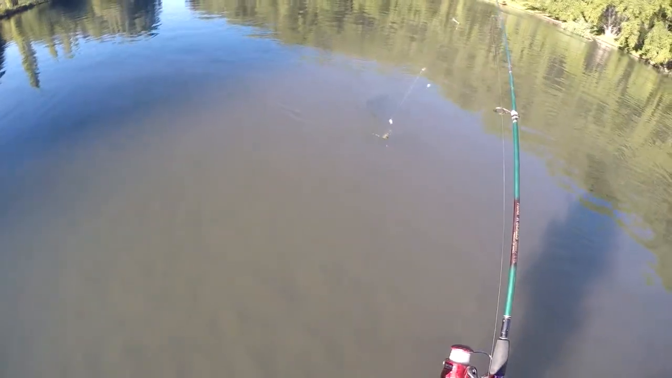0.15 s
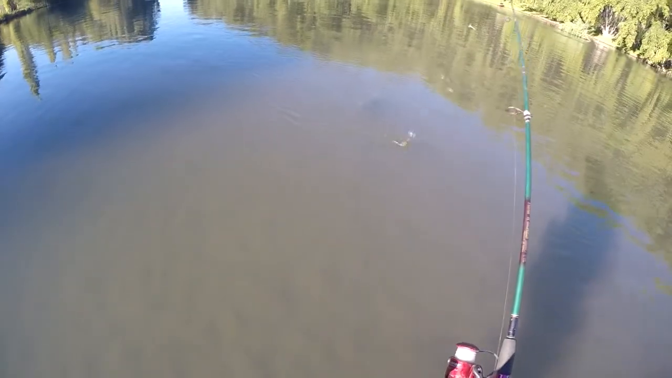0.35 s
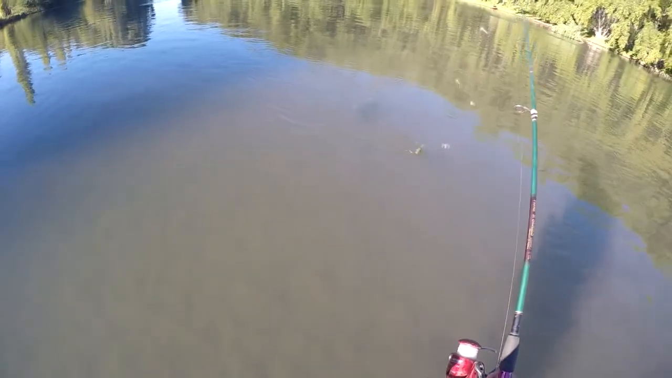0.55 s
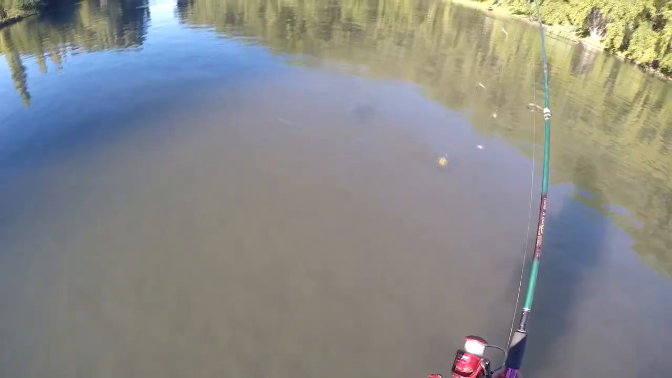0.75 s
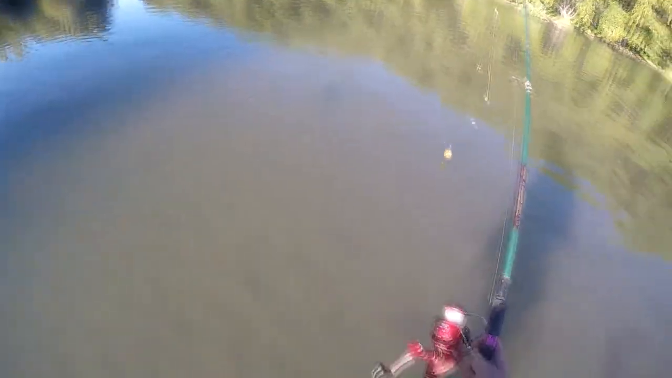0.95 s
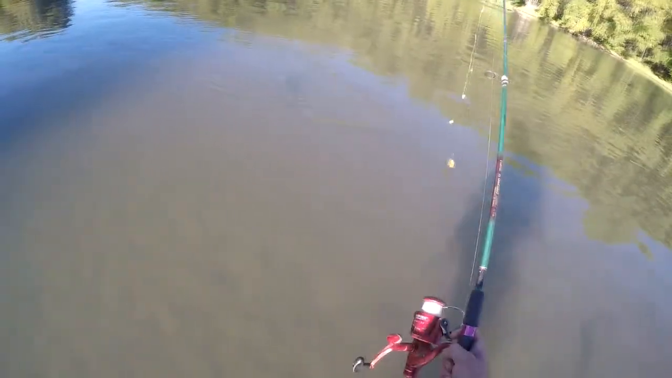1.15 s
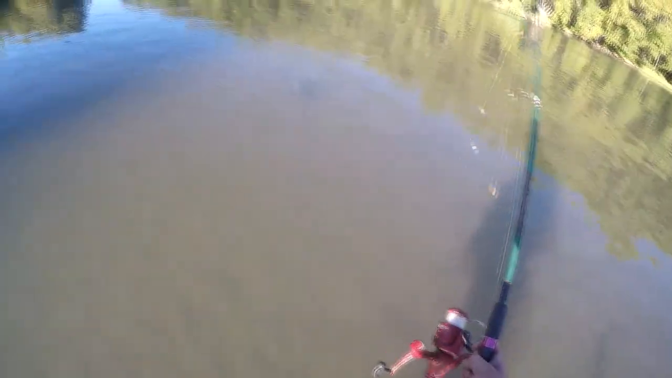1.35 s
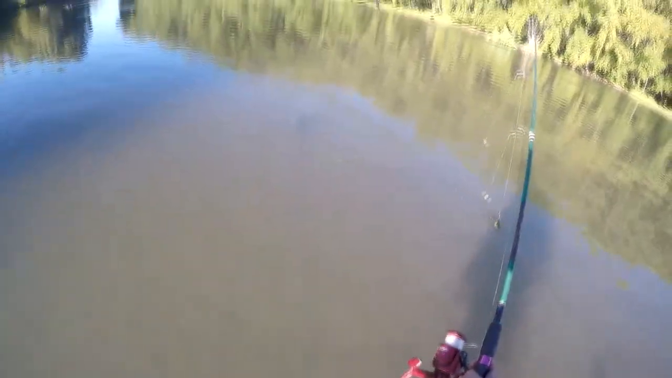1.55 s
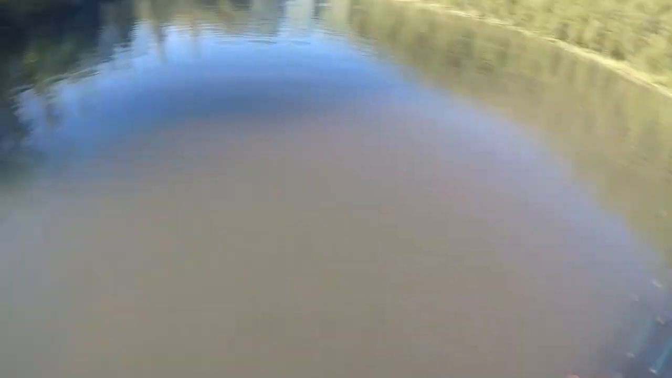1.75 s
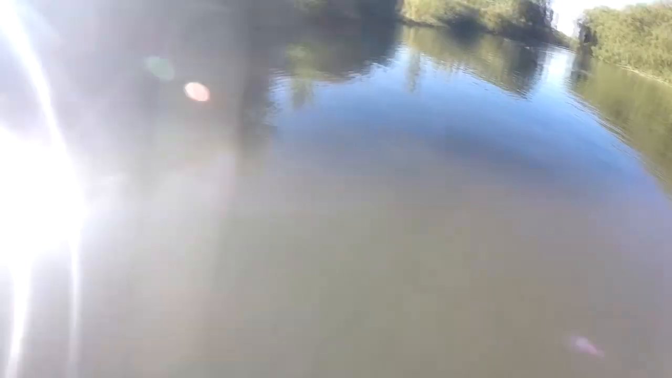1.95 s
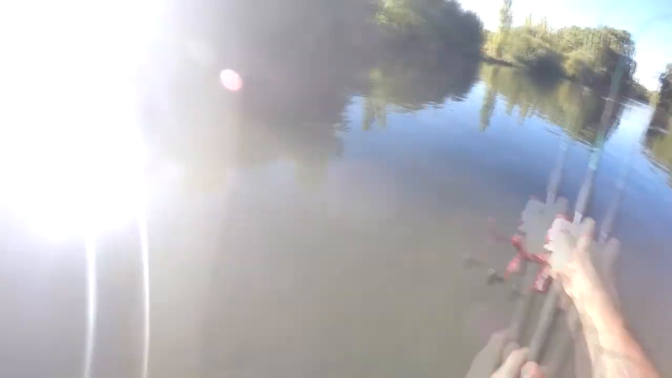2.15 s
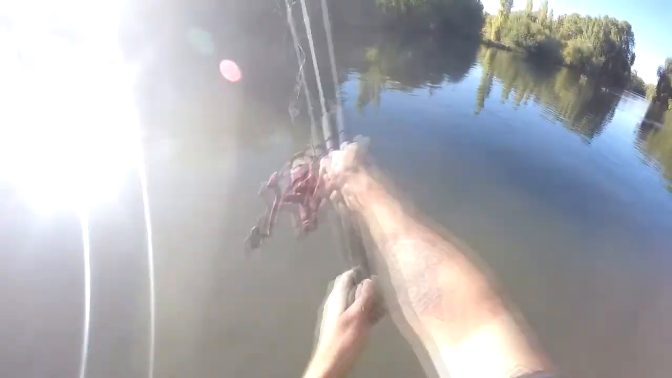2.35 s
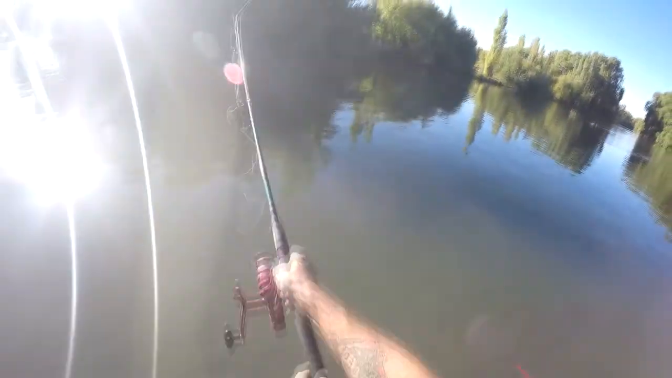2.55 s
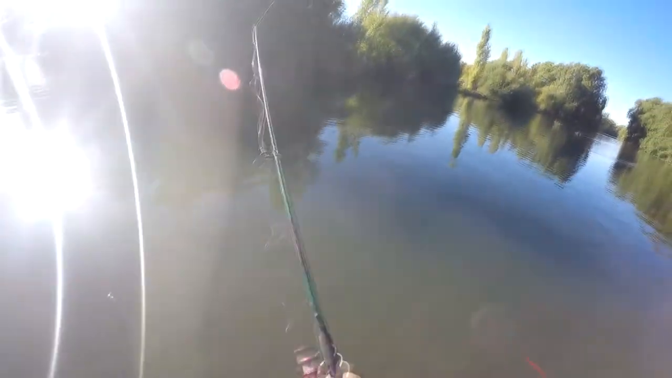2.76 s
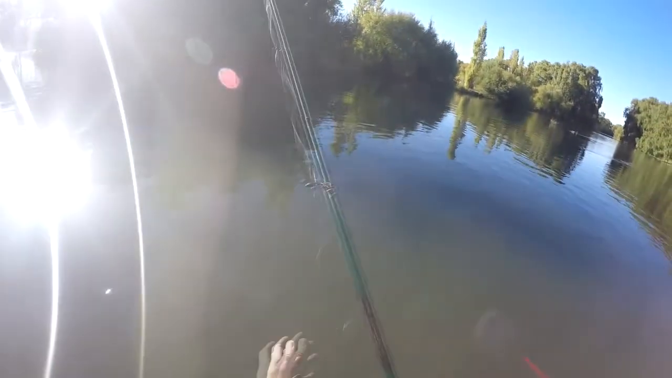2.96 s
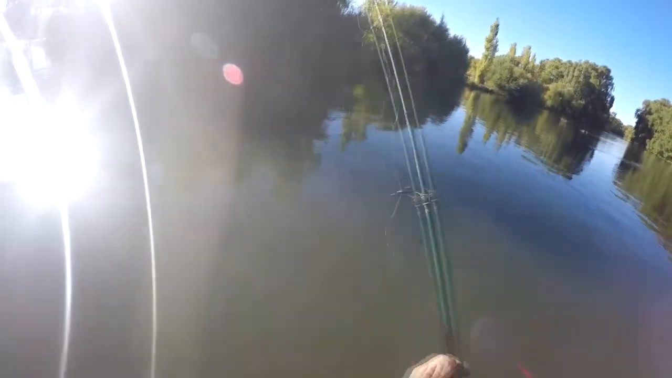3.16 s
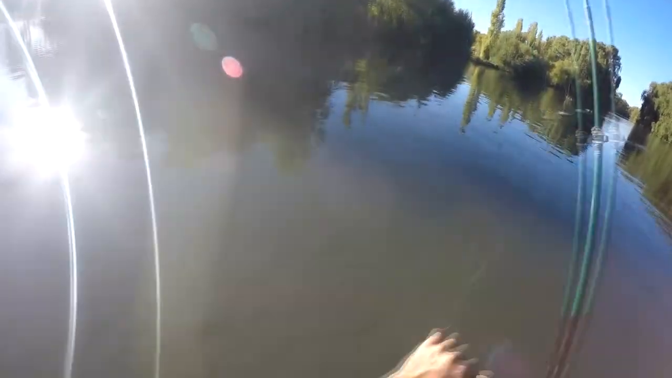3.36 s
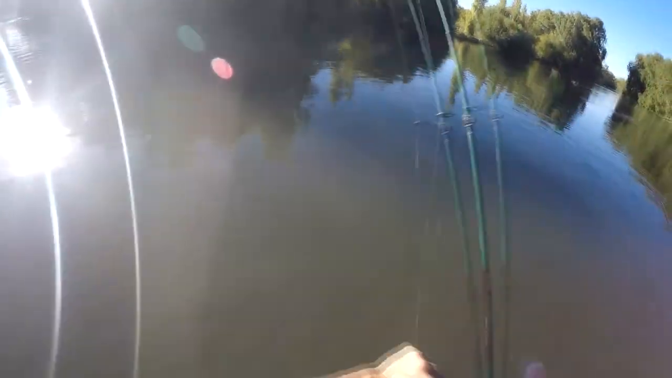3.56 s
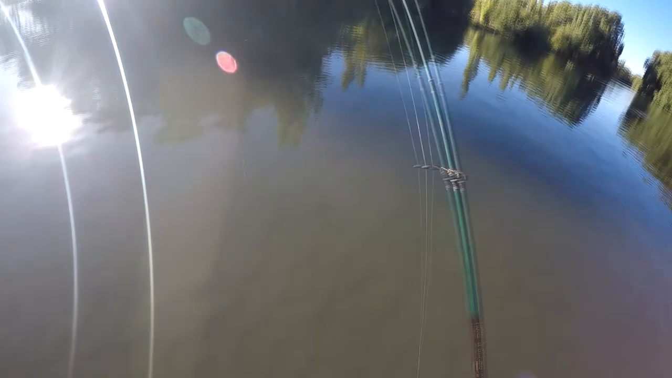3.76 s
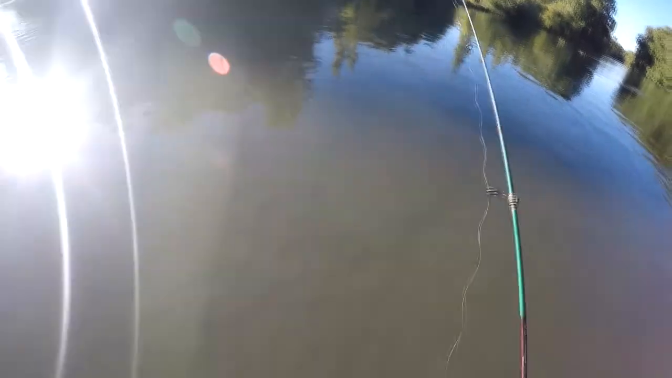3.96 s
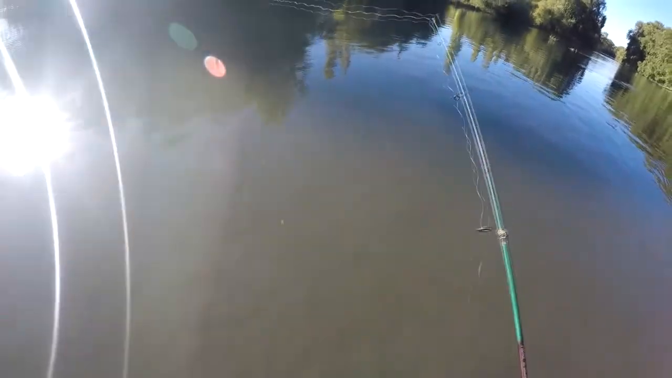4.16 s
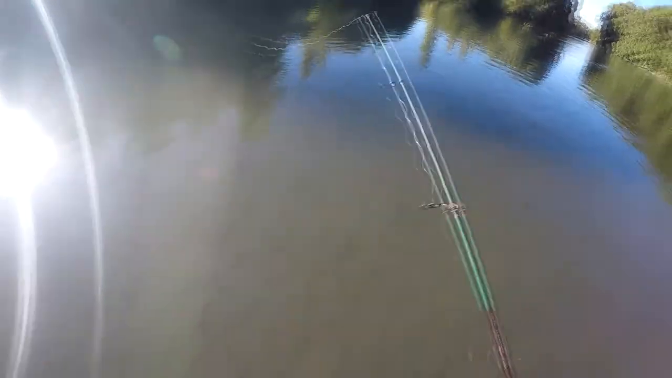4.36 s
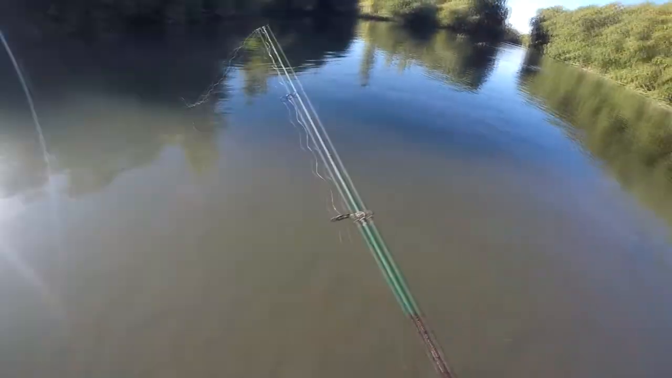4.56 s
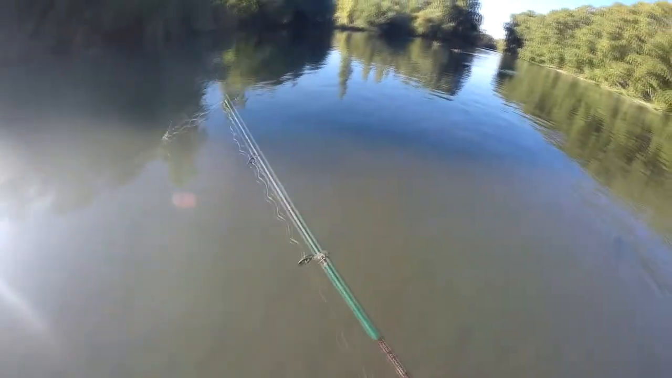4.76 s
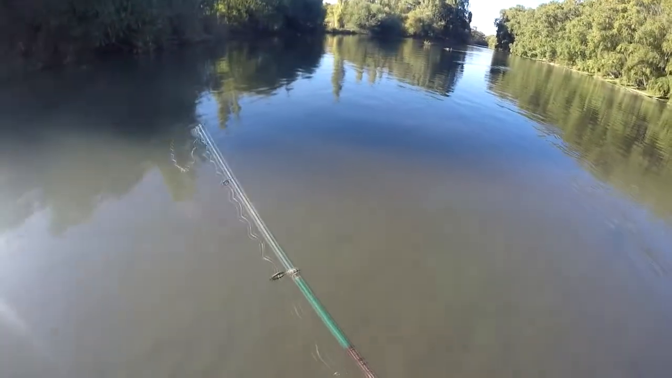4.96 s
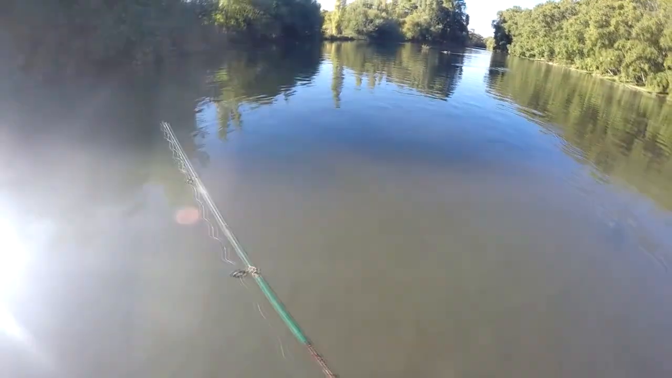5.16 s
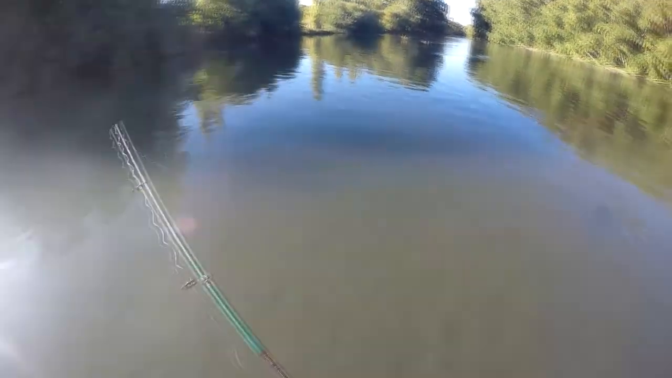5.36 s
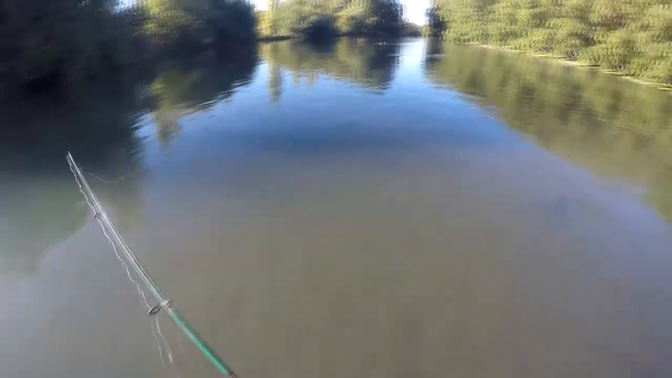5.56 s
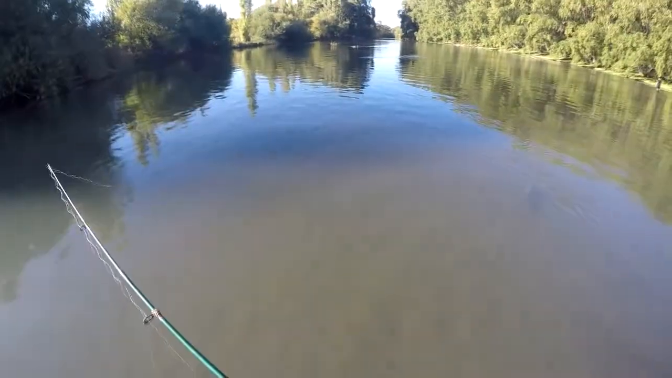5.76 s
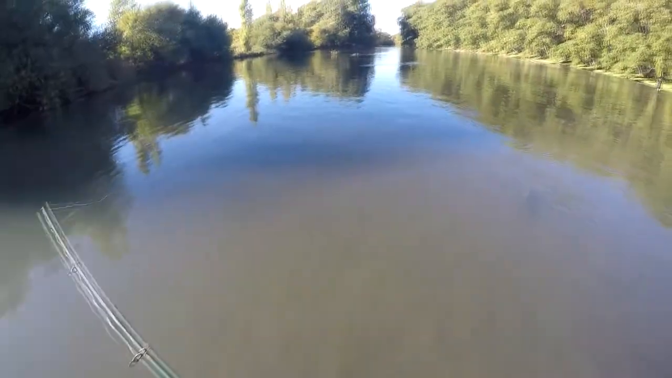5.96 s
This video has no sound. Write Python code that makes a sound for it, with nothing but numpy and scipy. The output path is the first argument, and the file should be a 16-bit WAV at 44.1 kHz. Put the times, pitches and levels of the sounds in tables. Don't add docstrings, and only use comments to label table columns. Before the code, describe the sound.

Outdoors by a still river, heard through a small camera in a closed plastic case. Steady faint hiss and whine sit under low, lurching wind and movement rumble. Cloth rustles and fingers tap the rod grip, then the cast sends line hissing out with quick, bright ticks and slaps. As it stops, fingers click; later the reel rattles and knocks sharply, followed by quiet rustling and soft low thumps.

```python
import sys
import numpy as np
from scipy import signal
from scipy.fft import rfft, irfft
from scipy.io import wavfile
from scipy.ndimage import uniform_filter1d

SR = 44100
rng = np.random.default_rng(int(sys.argv[2]) if len(sys.argv) > 2 else 0)


def wav_record(signal):
    frames = np.transpose(np.atleast_2d(signal))
    bounded = np.clip(frames, -1, 1)
    quanta = np.round(bounded * 32767).astype(np.int16)
    wavfile.write(sys.argv[1], SR, quanta)


def makeup_ratio(level_db):
    decades = np.asarray(level_db, float) / 20
    return 10 ** decades


N = 265658

# pitch_hz, density_db [dB per Hz]
HISS_COLOUR = [(55, -22), (90, 6.5), (190, -1), (300, -5.5), (500, -8), (780, -10), (1500, -12.5),
               (2250, -14.5), (2800, -13.5), (5400, -14), (7900, -20), (11800, -22), (12300, -22.5),
               (15400, -25.5)]
# pitch_hz, level_db
WHINES = [(10250, -90), (10729, -90), (10789, -90), (11688, -87), (11808, -92), (13666, -94), (14626, -95)]
# time_s, rumble_db
WIND_RUMBLE = [(0.0, -47), (0.1, -42.5), (0.44, -53.5), (1.24, -42.5), (1.59, -40), (1.93, -24),
               (1.98, -33), (2.38, -26.5), (2.48, -29.5), (2.9, -23.5), (2.97, -36), (4.78, -33.5),
               (4.84, -47), (5.28, -36.5), (5.33, -50), (5.53, -36.5), (5.6, -60), (6.02, -51.5)]
# peak_s, rumble_db, rise_s [per 10 dB], fall_s [per 10 dB], buffeting_db [against rumble]
LURCHES = [(.27, -48, 0, -0.24, 7), (.82, -48, 0.5, -0.8, -12), (1.08, -31.5, 0.15, 0.08, -15),
           (1.31, -36.5, 0.2, 0.1, -40), (1.81, -33, 0.06, 0.14, -5), (1.92, -29, 0.07, .04, -28),
           (2.05, -30, -0.07, 0.15, -6.5), (2.3, -27, -0.1, 0.19, -10), (2.88, -37, 0.3, -0.3, -26),
           (3.08, -31.5, 0.14, -0.02, -8), (3.43, -32.5, 0.37, 0.17, -4.5), (3.77, -29.5, 0.1, 0.1, -29),
           (4.31, -37, 0.1, 0.02, -31), (4.48, -39, 0.4, -0.1, -33), (4.74, -36.5, 0.1, 0, -14),
           (5.0, -40.5, 0.1, -0.05, -8), (5.26, -34.5, 0.08, 0, -7), (5.5, -36, 0, -0.04, -26),
           (5.75, -46, 0.4, 0.15, -11)]
# peak_s, rustle_db, rise_s [per 10 dB], fall_s [per 10 dB], lower_part_db [against rustle]
SLEEVE_MOVES = [(.848, -65.5, 1, 0.6, -1), (.97, -61, -0.64, 0.07, 1.5), (1.085, -65, -0.6, 0.2, 1.5),
                (1.39, -62.5, -0.45, 0.5, 3), (1.455, -62.5, -0.5, -1.5, 0), (1.635, -59, -0.2, 0.6, -6),
                (1.685, -52, 0.03, 0.06, -2), (1.812, -47.5, .03, .05, -5), (1.868, -41, .018, .018, -1),
                (1.905, -46, .012, .03, 0), (2.09, -50, .014, .07, -5), (2.148, -51, .03, .06, -3),
                (2.444, -61, 2.5, -1.7, -24), (2.51, -50, 0.05, 0.04, -4), (2.62, -64, -0.6, 0, -2),
                (2.744, -62.5, 0.3, 0.34, -1.5), (2.794, -55.5, 0.09, 0.07, -1.5), (3.2, -68, 1.5, .5, -18),
                (3.43, -60.5, 0.5, 0.5, -26), (3.65, -70, -4, 3, -19), (4.25, -64.5, 0.12, 0, 4),
                (4.46, -59, 0.25, -0.04, -1), (4.72, -60.5, 0.4, 1, -3.5), (3.53, -59, 0.3, 0.24, -22),
                (5.234, -59, 0.3, 0.5, -9), (5.6, -70.5, -2, 9, -3.5)]
# start_s, peak_db, pitch_hz
FINGER_TAPS = [(0.963, -49, 2110), (1.771, -49, 2250), (1.8, -42, 2000), (1.811, -46, 2350),
               (1.82, -45, 1150), (1.862, -44, 2250), (1.866, -40.5, 1090), (1.868, -53, 1700),
               (1.877, -48, 1190), (1.899, -49, 2200), (1.913, -51, 1200), (1.938, -46, 2060),
               (2.393, -56, 4000), (2.4025, -61, 4200), (2.4192, -51, 4080), (2.793, -39, 2070),
               (2.9065, -38.5, 2150), (3.4207, -48.5, 3900), (3.4235, -51, 3140), (3.444, -44, 2400),
               (3.4574, -42.5, 2410), (3.4751, -38, 3430), (3.4756, -45, 2330), (3.4756, -40.5, 7100),
               (3.4765, -47, 5300), (3.518, -47, 7490), (3.518, -41, 5040), (3.5202, -40.5, 2300),
               (3.521, -53, 4130), (3.519, -46, 3100), (3.5215, -56, 10500), (3.5307, -49, 2100),
               (3.5472, -44, 2410), (3.5684, -50, 3500), (3.5691, -47.5, 2260), (3.5741, -53, 2150),
               (3.596, -62, 2190), (3.6714, -45.5, 3100), (3.6741, -51, 2080), (3.672, -49, 3800),
               (3.6841, -50, 3300), (3.6841, -48, 2150), (3.701, -52, 2500), (3.755, -54, 2200),
               (4.226, -49, 2140), (4.254, -45.5, 2020), (5.0218, -49, 4310), (5.0222, -55, 5500),
               (5.0271, -42.5, 2270), (5.0338, -54, 3790), (5.5259, -51, 4220), (5.5402, -54.5, 5860),
               (5.5417, -49, 2070), (5.5424, -52, 4050), (5.5579, -48, 4070), (5.5703, -61, 3500),
               (5.5818, -50, 2310), (5.5818, -43, 5370), (5.5818, -45, 4120), (5.5821, -57, 7490),
               (5.5821, -54, 10500)]
# start_s, peak_db
ROD_JERKS = [(1.866, -45), (1.859, -48), (2.09, -54), (2.135, -50), (2.149, -49.5), (2.3205, -46),
             (2.354, -45), (2.394, -54), (2.4182, -41), (2.486, -48), (2.508, -52), (2.528, -45),
             (2.558, -50), (2.587, -44), (2.627, -44), (2.664, -42), (2.71, -47), (2.731, -49),
             (2.985, -40), (3.019, -45), (3.0915, -50), (3.1482, -35.5), (3.168, -49), (3.2555, -41),
             (3.333, -48), (3.364, -49), (3.375, -47), (3.399, -48), (4.536, -50), (4.657, -47),
             (4.74, -45), (4.859, -53.5), (5.027, -47), (5.582, -47)]
# peak_s, hiss_db, rise_s [per 10 dB], fall_s [per 10 dB], top_db [against hiss]
LINE_DRAWN = [(1.864, -51, 0.014, 0.018, -18), (1.91, -70, .02, -0.1, -20), (4.06, -65, 0.25, 0, -14),
              (2.138, -55, 0.1, 0.1, -19), (2.3, -58, .03, .04, -12), (3.025, -56, .05, .05, -10),
              (3.17, -60, .02, .03, -8), (4.45, -68, 0.4, 0, -19), (4.79, -62.5, 0.6, 0, -18),
              (5.19, -59, 0.2, 0.2, -16), (5.3, -60.5, 0.24, .17, -20), (5.57, -63, 0.17, 0.25, -15)]
# time_s, hiss_db, top_db [against hiss], nylon_pitch_hz
LINE_RUN = [
    (2.24, -68, -11, 10700),
    (2.292, -52.5, -5, 10700),
    (2.358, -61.5, -17, 11000),
    (2.426, -57, -8, 11700),
    (2.72, -54.5, -6.5, 13200),
    (3.012, -56, -1.5, 11700),
    (3.14, -61, 0, 11100),
    (3.398, -55, -2, 10300),
    (3.5, -62, -15, 9900),
]
# start_s, peak_db, pitch_hz
RING_SLAPS = [(2.2813, -52, 3700.0), (2.2905, -48, 3070), (2.2945, -49, 7410.0), (2.3035, -48, 7410.0),
              (2.3127, -44, 2970), (2.3197, -44.5, 5400), (2.3534, -54, 5600.0), (2.4185, -49, 4740.0),
              (2.4247, -47, 3270.0), (2.435, -55.8, 7750.0), (2.4856, -53, 4390.0), (2.4963, -47, 4390.0),
              (2.53, -47, 4310.0), (2.5864, -42, 4180), (2.6175, -47, 4130.0), (2.6278, -51, 4220.0),
              (2.641, -49, 3880.0), (2.6552, -51.1, 5340.0), (2.6684, -49, 3270.0), (2.6792, -49.0, 5340.0),
              (2.7106, -46.9, 5540), (2.7315, -49, 3960.0), (2.7483, -51, 5170.0), (2.752, -54, 4050.0),
              (2.76, -48.1, 3880.0), (2.766, -47, 4390.0), (2.7792, -46, 4000), (2.7862, -47, 6000),
              (2.7959, -50.5, 5600.0), (2.8074, -50.9, 5430.0), (2.8283, -58, 7580.0),
              (2.8485, -52, 5770.0), (2.856, -56, 5860.0), (2.865, -48.1, 4220.0), (2.8742, -50, 5250.0),
              (2.8899, -49, 3960.0), (2.9575, -58, 5600.0), (2.9875, -47, 5130), (2.9942, -47.5, 3790.0),
              (3.0074, -52.6, 7320.0), (3.0176, -42.5, 5340), (3.0211, -52, 3140), (3.0251, -51, 4130.0),
              (3.0326, -52, 7410.0), (3.0386, -56, 3190.0), (3.0513, -56.4, 7490.0), (3.0912, -46, 7060.0),
              (3.1473, -45, 5400), (3.1606, -50, 7490.0), (3.2546, -48, 7050), (3.2855, -47, 3100.0),
              (3.312, -55, 4650.0), (3.3317, -53, 5510.0), (3.3417, -49, 3790.0), (3.3746, -52.5, 3790.0),
              (3.3803, -55, 5600.0), (3.3853, -54, 4310.0), (3.399, -51, 4820.0), (3.4225, -46, 5600.0),
              (3.4427, -43, 6900)]
# start_s, peak_db, pitch_hz
NYLON_WHIPS = [(2.291, -56.9, 11020.0), (2.3013, -56, 10510.0), (2.4195, -51.5, 11280.0),
               (2.4866, -62, 12400.0), (2.5866, -53.8, 12580.0), (2.6173, -54, 12490.0),
               (2.6278, -55, 12140.0), (2.6555, -59.7, 13180.0), (2.6637, -52.8, 13090.0),
               (2.6729, -55, 12000.0), (2.7016, -59.2, 12830.0), (2.7111, -55, 12230.0),
               (2.7213, -54, 13000.0), (2.7308, -53, 12800.0), (2.7485, -69, 12920.0),
               (2.7575, -61.4, 12580.0), (2.7665, -63, 12400.0), (2.7762, -57, 12580.0),
               (2.7864, -55.8, 13010.0), (2.8069, -57.9, 13090.0), (2.8173, -56.2, 12920.0),
               (2.8286, -53.4, 13090.0), (2.8647, -59.4, 13260.0), (2.8852, -59.5, 12400.0),
               (2.9363, -59, 12580.0), (2.9451, -61, 12660.0), (2.9737, -60.5, 12750.0),
               (2.9837, -50, 12660.0), (2.9922, -59.9, 13260.0), (3.0074, -56.9, 13180.0),
               (3.0169, -49.9, 11710.0), (3.0324, -55, 11200.0), (3.0511, -57, 9220.0),
               (3.069, -57.8, 9040.0), (3.0905, -63, 13260.0), (3.1119, -58.5, 10420.0),
               (3.1471, -51.8, 12660.0), (3.1693, -56, 12230.0), (3.2222, -61, 12490.0),
               (3.2394, -55, 12660.0), (3.2544, -64, 9220.0), (3.3207, -63, 12490.0),
               (3.3317, -61.5, 12320.0), (3.3629, -59.5, 12400.0), (3.3716, -64, 12400.0),
               (3.3983, -58, 13260.0), (3.4217, -57.5, 9820.0), (3.4364, -56.3, 12920.0),
               (3.4748, -59, 9040.0), (3.518, -54, 10340.0)]
# start_s, end_s, peak_db
RATTLES = [
    (3.102, 3.581, -53.5),
    (3.419, 3.602, -57),
    (4.409, 4.551, -45),
    (4.671, 4.832, -49),
]
# start_s, peak_db, pitch_hz
REEL_KNOCKS = [(4.3997, -51.5, 2240.0), (4.402, -53, 6200), (4.4155, -53.3, 4050.0),
               (4.4237, -48.5, 5510.0), (4.4244, -54, 2500.0), (4.4247, -40.5, 3770),
               (4.4309, -49.9, 3700.0), (4.4314, -48, 2150.0), (4.4317, -54, 7490.0), (4.4317, -60, 1380.0),
               (4.4384, -47.1, 2070.0), (4.4409, -49, 3100.0), (4.4412, -50, 6800), (4.4571, -45.2, 1490),
               (4.4584, -48, 3190.0), (4.4596, -49, 1450), (4.4636, -65, 1290.0), (4.4731, -48, 2570),
               (4.4736, -53, 1892), (4.4831, -47.5, 676), (4.4868, -44.5, 4220.0), (4.4873, -53, 6890.0),
               (4.488, -47, 2580.0), (4.4903, -45, 1000), (4.4983, -52, 1000), (4.4998, -52, 3960.0),
               (4.5087, -43.5, 3130), (4.5135, -49, 4130), (4.5205, -49, 3780), (4.5357, -45, 3770),
               (4.5359, -39.5, 2020), (4.5776, -46.5, 2320), (4.5948, -50.2, 2020), (4.6038, -49, 3100.0),
               (4.6212, -53, 3270.0), (4.6497, -49, 1900), (4.6557, -41, 3590), (4.6806, -40.5, 1910),
               (4.6841, -51, 930), (4.6856, -51, 3100.0), (4.6921, -39.5, 2600), (4.6943, -48, 1460.0),
               (4.6968, -47, 3190.0), (4.7063, -41.5, 2070.0), (4.713, -55, 1980.0), (4.7195, -49, 2580.0),
               (4.7223, -42, 4600), (4.7265, -59, 5600.0), (4.7275, -46, 3100.0), (4.7325, -56, 1810.0),
               (4.7395, -53, 5600.0), (4.7422, -53, 2330.0), (4.7435, -46, 3380), (4.7477, -45, 1070),
               (4.7669, -40.5, 2550), (4.7871, -54, 3960.0), (4.8011, -55, 5940.0), (4.8041, -50, 2500.0),
               (4.8582, -43.5, 3780), (4.8732, -56, 3790.0)]
# start_s, peak_db, pitch_hz, t60_s
STRAP_BUMPS = [
    (4.033, -46, 293, 0.07),
    (4.447, -22.5, 33.7, 0.29),
    (4.462, -49, 427, 0.059),
    (4.536, -41, 376, 0.015),
    (5.958, -53, 1090, 0.018),
    (5.471, -31, 80.5, 0.058),
    (5.983, -35, 78.4, 0.048),
]
# pitch_hz, width_hz, level_db
CASE_LOW = [(967, 150, 1), (1250, 397, 9.5), (640, 1260, 2.5), (322, 380, -1)]
# pitch_hz, width_hz, level_db
CASE_MAIN = [(2130, 130, 4.5), (2000, 100, -33.5), (2320, 390, 3)]
# pitch_hz, width_hz, level_db
CASE_MID = [(3120, 120, 7), (3860, 240, 9), (4250, 300, 3), (5400, 500, 5), (6940, 2500, -10)]
# pitch_hz, width_hz, level_db
CASE_TOP = [(7500, 3900, -1), (10300, 350, -3.5), (11600, 800, -5), (12900, 900, -3), (13800, 3200, -19)]
# start_s, length_s
THIN_MOMENTS = [(1.096, .036), (1.29, .04), (1.81, .025), (1.905, .015), (2.055, .02), (2.305, .085),
                (2.567, .015), (2.592, .02), (3.062, .03), (3.59, .055), (3.765, .03), (4.295, .03),
                (4.47, .04), (4.635, .02), (4.85, .025)]

HISS_DB = -56
FRAME_HZ, FRAME_START_S = 59.94, .0045
BUZZ_HZ, BUZZ_SHARE, BUZZ_DB = 8570, .55, -74
BUFFET_DB, BUFFET_FOLLOWS = -46.5, .48
GUSTY_DB, GUSTS_PER_S = 4.0, 12
TAUT_DB_PER_OCTAVE = 9
COILS_PER_S, COIL_JITTER = 100, .08
COIL_DB, COIL_TOP_DB = 1.5, 3.2
RATTLES_PER_S, RATTLE_LOW_HZ, RATTLE_HIGH_HZ = 150, 600, 4200
TOP_EDGE_HZ = 15270
THIN_HZ, THIN_DB, SURVIVING = 13000, -22, .25


def rms_one(x):
    return x / np.sqrt(np.mean(x ** 2) + 1e-20)


def in_time(rows, outside=None):
    s, *columns = np.transpose(rows)
    return [np.interp(np.arange(N) / SR, s, c, outside, outside) for c in columns]


def swells(rows):
    s, db, rise, fall, second_db = np.transpose(rows)[:, :, None]
    t = np.arange(0, N + 32, 32) / SR
    before = (s - t) / np.maximum(rise, .003)
    after = (t - s) / np.maximum(fall, .003)
    level = db - 10 * np.maximum(before, after)
    gains = [np.sqrt(makeup_ratio(2 * part).sum(0)) for part in (level, level + second_db)]
    return [np.interp(np.arange(N) / SR, t, gain) for gain in gains]


def band(x, low_hz, high_hz, order=2):
    return signal.sosfilt(signal.butter(order, [low_hz, high_hz], "band", fs=SR, output="sos"), x)


def ring(x, modes):
    out = 0
    for k, (hz, width, db) in enumerate(modes):
        r = np.exp(-np.pi * width / SR)
        a = [1, -2 * r * np.cos(2 * np.pi * hz / SR), r * r]
        out = out + (-1) ** k * makeup_ratio(db) * signal.lfilter([(1 - r * r) / 2, 0, (r * r - 1) / 2], a, x)
    return out


def grains(per_s, spread_db, smooth):
    sizes = makeup_ratio(spread_db * np.minimum(rng.exponential(1, N), 4)) * rng.choice([-1, 1], N)
    scratches = sizes * (rng.random(N) < per_s / SR)
    return rms_one(scratches) + smooth * rng.standard_normal(N)


def burst(decay_s, rise_s=.0001, tail_db=-14, size=2200):
    t = np.arange(size) / SR
    shape = np.exp(-t / decay_s) + makeup_ratio(tail_db) * np.exp(-t / (5 * decay_s))
    return rng.standard_normal(size) * shape * (1 - np.exp(-t / rise_s))


def add(out, s, sound, peak_db):
    i = round(s * SR)
    part = out[i:i + len(sound)]
    part += (makeup_ratio(peak_db) * sound / np.abs(sound).max())[:len(part)]


def ticks(rows, scuff_s, width_share, gain_db, case_db):
    out = np.zeros(N)
    for s, db, hz in rows:
        scuff = burst(scuff_s, rise_s=.00089, tail_db=-16.5, size=900)
        scuff[4] += 3
        part = ring(scuff, [(hz, 200 + width_share * hz, 0)])
        part = ring(part, [(hz, 600 + 2 * width_share * hz, 0)])
        add(out, s + .0005, part, db + gain_db)
        add(out, s + .0005, ring(scuff, CASE_MAIN + CASE_MID), db + gain_db + case_db)
    return out


def electronics():
    hz, t = np.maximum(np.fft.rfftfreq(N, 1 / SR), 1), np.arange(N) / SR
    colour_hz, colour_db = np.transpose(HISS_COLOUR)
    colour = makeup_ratio(np.interp(np.log(hz), np.log(colour_hz), colour_db))
    hiss = makeup_ratio(HISS_DB) * rms_one(irfft(rfft(rng.standard_normal(N)) * colour, N))
    frame, within = np.divmod(FRAME_HZ * (t - FRAME_START_S) + 1.5, 1)
    start, strength = rng.random((2, int(frame[-1]) + 1))[:, frame.astype(int)]
    gate = np.clip((BUZZ_SHARE / 2 - np.abs(within - .5)) * 8 + .5, 0, 1)
    gate = gate * makeup_ratio(4 * strength + 2.5 * (frame % 2))
    buzz = makeup_ratio(BUZZ_DB) * rms_one(gate * np.sin(2 * np.pi * (BUZZ_HZ * t + start)))
    whines = sum(makeup_ratio(db + 2.5) * np.sin(2 * np.pi * pitch * t) for pitch, db in WHINES)
    return hiss + buzz + whines


def wind():
    (steady_db,), (deep, quick) = in_time(WIND_RUMBLE), swells(LURCHES)
    where = np.arange(N) / SR * GUSTS_PER_S
    flutter = np.interp(where, np.arange(200), rng.standard_normal(200))
    follow_db = BUFFET_FOLLOWS * (steady_db - steady_db.mean())
    deep = deep + makeup_ratio(steady_db - 4)
    quick = quick + makeup_ratio(BUFFET_DB - 3.5 + follow_db + GUSTY_DB * flutter)
    rumble = 0
    for low_hz, high_hz, even_s, gain in [(11.9, 30.5, .2, deep), (32.8, 69.0, .057, quick)]:
        lumps = band(rng.standard_normal(N + SR), low_hz, high_hz)[SR:]
        level = uniform_filter1d(lumps ** 2, round(even_s * SR))
        level = uniform_filter1d(level, round(even_s * SR / 2))
        rumble = rumble + gain * lumps / np.sqrt(level + 1e-12)
    sealed = signal.sosfilt(signal.butter(4, 85, fs=SR, output="sos"), rumble)
    eddies = makeup_ratio(-36.5) * deep * rms_one(band(rng.standard_normal(N), 115, 433))
    return sealed + eddies


def sleeve():
    main, low = swells(SLEEVE_MOVES)
    scratch = grains(per_s=1500, spread_db=3.5, smooth=.9)
    scratch = signal.sosfilt(signal.butter(2, 5000, fs=SR, output="sos"), scratch)
    rustle = makeup_ratio(-2.4) * main * rms_one(ring(scratch, CASE_MAIN))
    return rustle + makeup_ratio(-1.5) * low * rms_one(ring(scratch, CASE_LOW))


def finger_taps():
    return ticks(FINGER_TAPS, scuff_s=.0013, width_share=.11, gain_db=3, case_db=-23)


def jerks():
    out = np.zeros(N)
    for s, db in ROD_JERKS:
        modes = [(hz, 2.5 * width, level + rng.normal(0, 3))
                 for hz, width, level in CASE_MAIN[::2] + CASE_MID]
        add(out, s, ring(burst(.0011, rise_s=.0004, tail_db=-10, size=900), modes), db)
    return out


def patchy(x, modes, patchy_db, per_s):
    where = np.arange(N) / SR * per_s
    knots = rng.standard_normal((len(modes), int(where[-1]) + 2))
    out = 0
    for k, mode in enumerate(modes):
        gain = makeup_ratio(patchy_db * np.interp(where, np.arange(len(knots[k])), knots[k]))
        out = out + (-1) ** k * gain * ring(x, [mode])
    return rms_one(out)


def taut_hz(s):
    rows = np.array(LINE_RUN)
    return np.interp(s, rows[:, 0], rows[:, 3])


def coils():
    gap, strength = rng.standard_normal((2, 800))
    leaves_s = np.cumsum(1 + COIL_JITTER * gap) / COILS_PER_S
    turn = np.interp(np.arange(N) / SR, leaves_s, np.arange(800))
    return (1 + .3 * strength[turn.astype(int)]) * 2 * np.sin(np.pi * turn) ** 6 - 1


def line_hiss():
    (mid, top), (run_db, top_db, _) = swells(LINE_DRAWN), in_time(LINE_RUN, -100)
    mid, top = mid + makeup_ratio(run_db), top + makeup_ratio(run_db + top_db)
    taut = taut_hz(np.arange(N) / SR)
    rub, flick = (grains(per_s=2500, spread_db=4, smooth=.5) for _ in range(2))
    body = patchy(rub, CASE_MID + [(5620, 300, 2)], patchy_db=2.2, per_s=40)
    body = rms_one(body + makeup_ratio(-3.7) * rms_one(band(rub, 2420, 7280)))
    edge = 0
    for hz, width, db in CASE_TOP:
        near = makeup_ratio(db - TAUT_DB_PER_OCTAVE * np.abs(np.log2(taut / hz)))
        edge = edge + near * np.sqrt(width) * patchy(flick, [(hz, width, 0)], patchy_db=3.5, per_s=28)
    throb = coils()
    body = makeup_ratio(-.8) * mid * rms_one(body * makeup_ratio(COIL_DB * throb))
    return body + makeup_ratio(-1.5) * top * rms_one(edge * makeup_ratio(COIL_TOP_DB * throb))


def ring_slaps():
    return ticks(RING_SLAPS, scuff_s=.0008, width_share=.23, gain_db=7, case_db=-6)


def nylon_whips():
    return ticks(NYLON_WHIPS, scuff_s=.00088, width_share=.18, gain_db=11, case_db=-16)


def rattles():
    out = np.zeros(N)
    for start, end, db in RATTLES:
        count = round(RATTLES_PER_S * (end - start))
        for when, pitch, weak in rng.random((30, 3))[:count]:
            hz = RATTLE_LOW_HZ * (RATTLE_HIGH_HZ / RATTLE_LOW_HZ) ** pitch
            modes = [(hz, .098 * hz, 0), (2150, 200, -2), (3130, 200, -5)]
            tick = ring(burst(.002, tail_db=-12), modes)
            add(out, start + (end - start) * when, tick, db - 8 * weak)
    return out


def bumps():
    out, t = np.zeros(N), np.arange(SR // 8) / SR
    for s, db, hz, t60 in STRAP_BUMPS:
        push = -np.sin(2 * np.pi * hz * t) * makeup_ratio(-60 * t / t60) * (1 - np.exp(-t * hz * 3))
        add(out, s, push, db)
    return out


def reel_knocks():
    return ticks(REEL_KNOCKS, scuff_s=.0015, width_share=.088, gain_db=2, case_db=-13)


def scene():
    handling = sleeve() + finger_taps() + jerks()
    line = line_hiss() + ring_slaps() + nylon_whips()
    reel = rattles() + bumps() + reel_knocks()
    return (electronics() + wind() + handling + line + reel)[None]


def thin_top(x):
    t, thin = np.arange(N) / SR, np.zeros(N)
    for start, length in THIN_MOMENTS:
        thin[(t > start) & (t < start + length)] = 1
    spectrum, hz = rfft(x[0]), np.fft.rfftfreq(N, 1 / SR)
    for low in np.arange(THIN_HZ, 16000, 400):
        lost = thin * np.repeat(rng.random(N // 256 + 1) > SURVIVING, 256)[:N]
        strip = irfft(spectrum * (hz >= low) * (hz < low + 400), N)
        x = x - (1 - makeup_ratio(THIN_DB)) * uniform_filter1d(lost, 128) * strip
    return x


def band_limit(x):
    return signal.sosfilt(signal.butter(12, 15860, fs=SR, output="sos"), x)


def record(dry):
    edge = signal.ellip(8, .3, 24, TOP_EDGE_HZ, fs=SR, output="sos")
    mix = thin_top(signal.sosfilt(edge, dry))
    return band_limit(mix)


dry = scene()
out = record(dry)
wav_record(out)
```